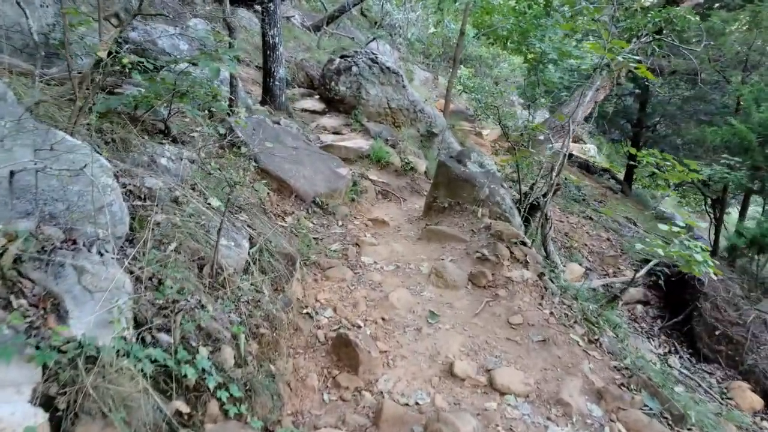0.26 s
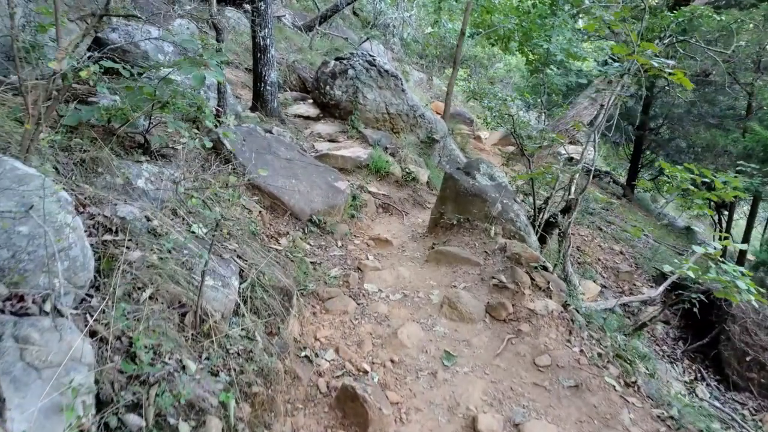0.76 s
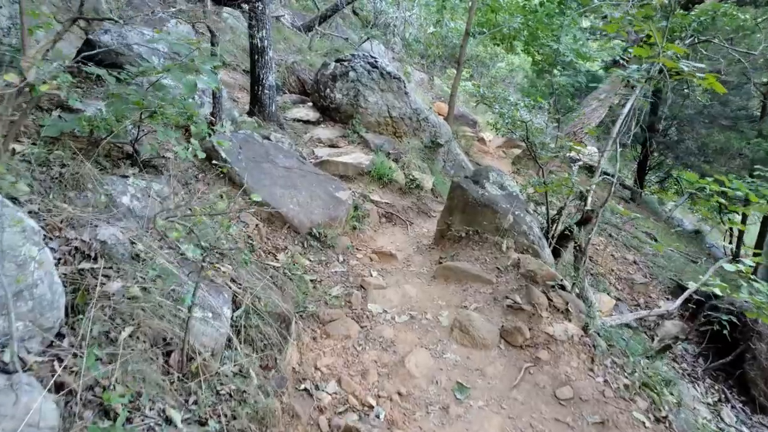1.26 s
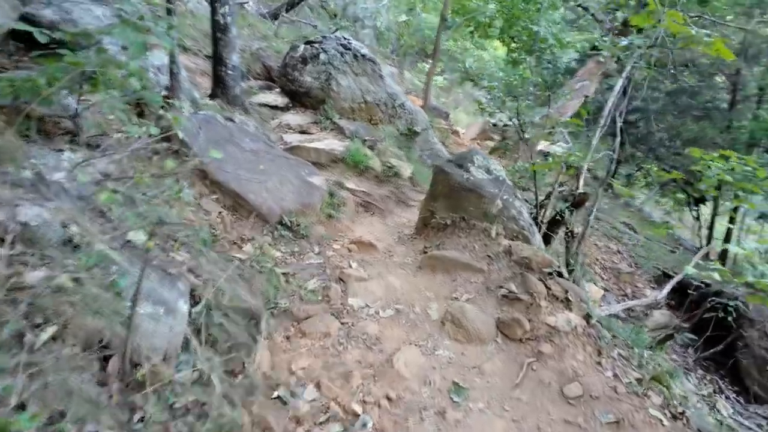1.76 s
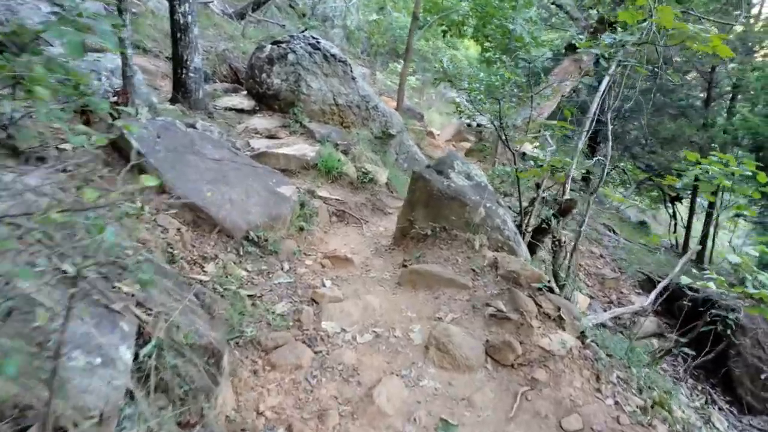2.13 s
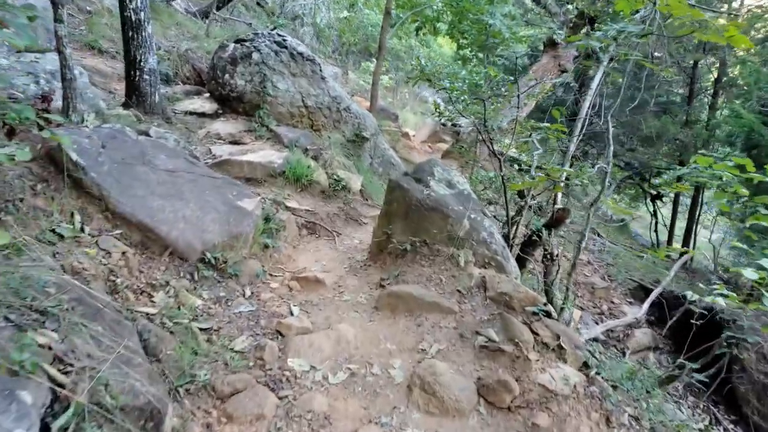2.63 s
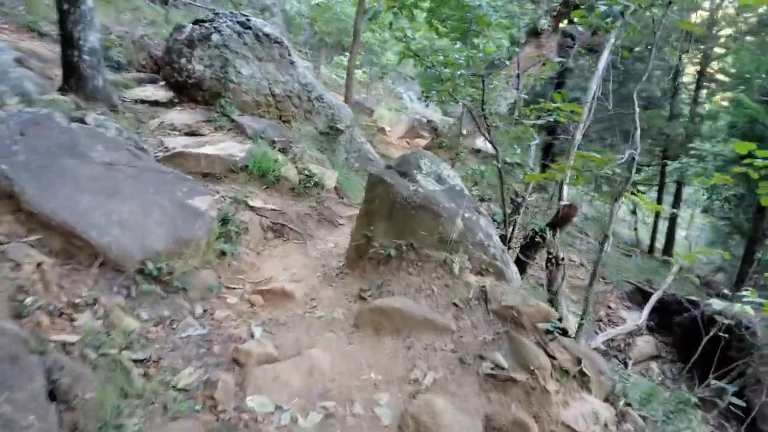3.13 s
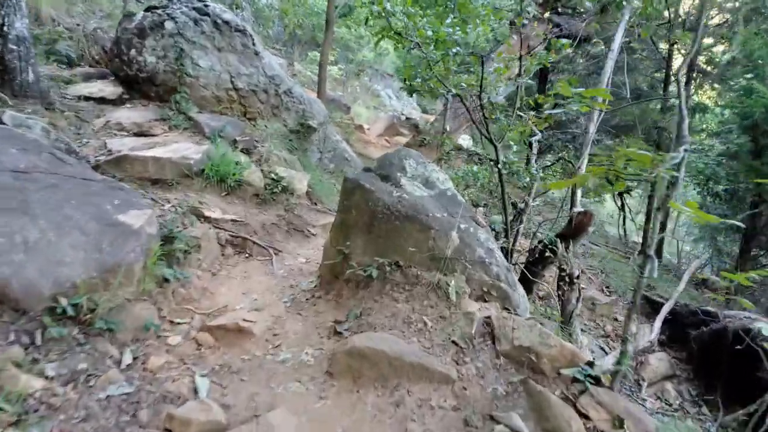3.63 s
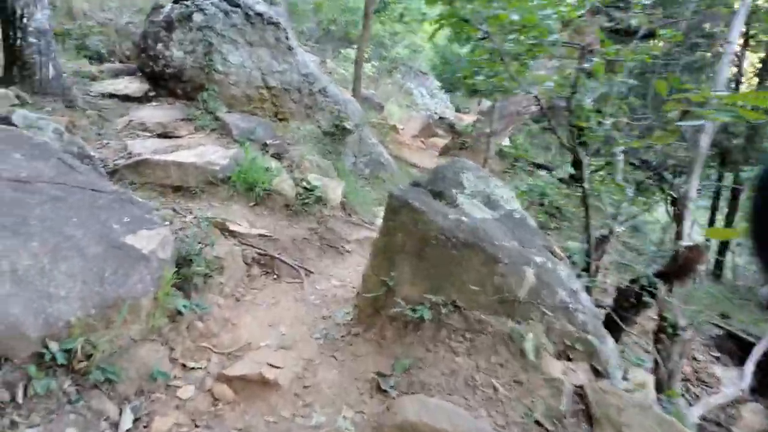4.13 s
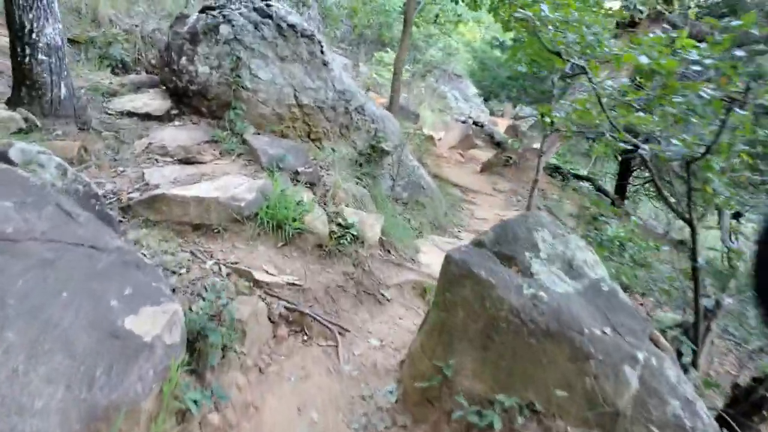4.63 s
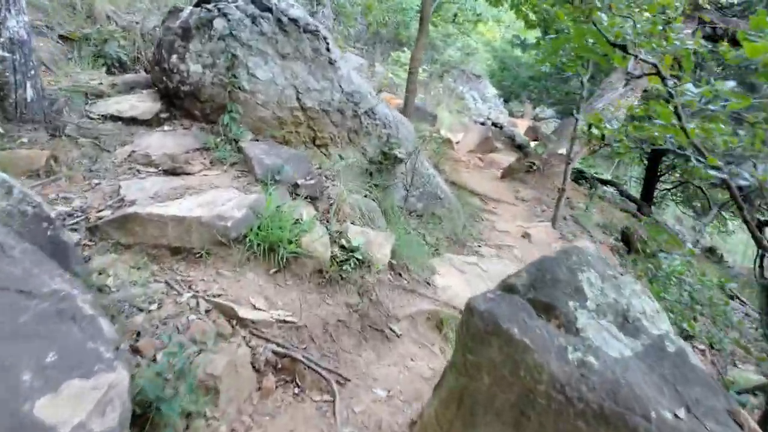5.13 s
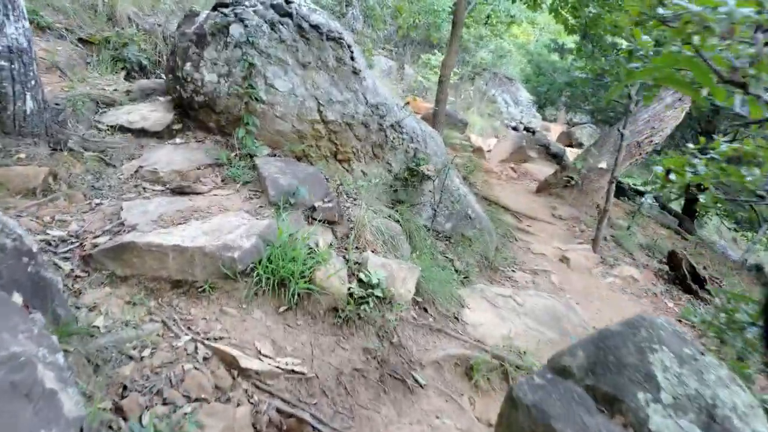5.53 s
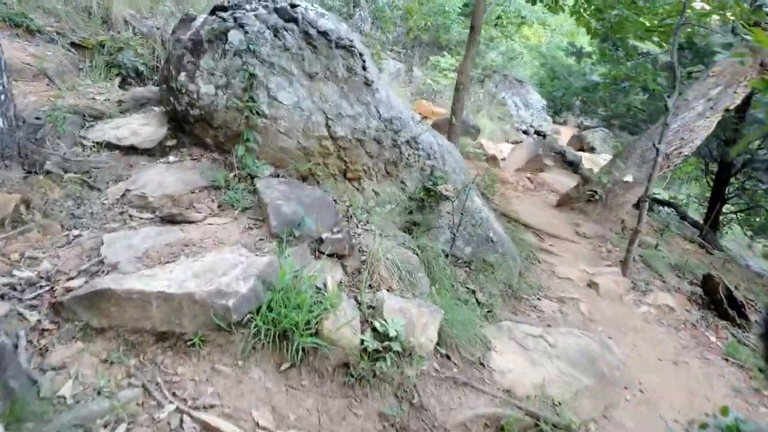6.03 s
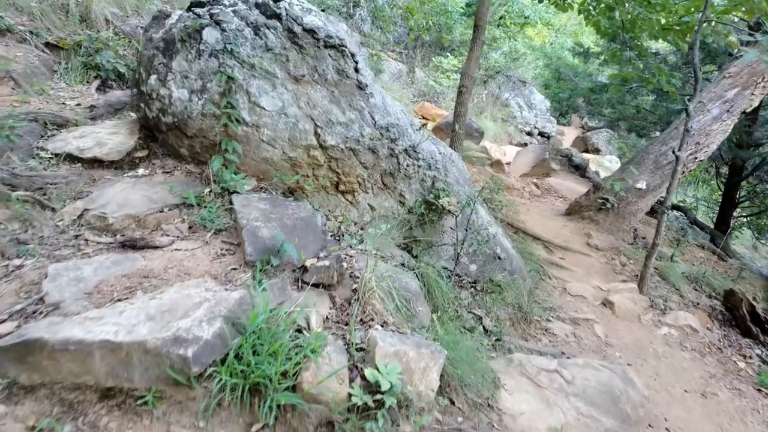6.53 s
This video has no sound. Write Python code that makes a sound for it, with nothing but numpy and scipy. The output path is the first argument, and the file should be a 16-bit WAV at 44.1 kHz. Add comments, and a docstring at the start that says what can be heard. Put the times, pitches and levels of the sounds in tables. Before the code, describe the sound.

A quiet forest heard in stereo by a microphone carried along a rocky trail. Soft scuffs of grit open the scene over a low air rumble, faint leaf hiss and a thin high insect tone. From about 0.85 s a loud bird sings short clear notes, with a long, high falling whistle at 1.0 s, then quick rising chirps until 2.1 s, echoing through the trees. A sharp twig-like snap comes near 2.15 s. Rapid down-sweeping chirps repeat from 1.9 to 3.0 s, followed by hoarse upward slurs and thin whistles. A fast warble runs from 3.7 to 4.25 s, then buzzy calls, and slower down-sweeps from 4.9 to 5.7 s. Small high whistles finish from 5.9 s. Boots crunch gravel and brush dry litter throughout, knocking stones around 1.5, 3.2 and 5.1 to 5.3 s, and again from 5.7 to 6.4 s.

```python
"""A forest with a rocky dirt trail, where songbirds whistle, trill and buzz while a hiker walks.
Each bird note is a gliding tone, and the trunks scatter it into a long tail of random echoes.
Boots knock on stones as short dying rings, and shaped noise makes the grinding grit and dull treads.
Behind them are a low rumble, a soft hiss of leaves and a thin insect tone, all filtered noise."""
import sys
import numpy as np
from scipy import signal
from scipy.fft import rfft, irfft
from scipy.io import wavfile
from scipy.ndimage import map_coordinates

SR = 44100
rng = np.random.default_rng(int(sys.argv[2]) if len(sys.argv) > 2 else 0)


def file_out(sig):
    """Save sig as 16-bit WAV at sys.argv[1]."""
    # one column per channel
    cols = np.atleast_2d(sig).T
    # limit, then scale
    lim = np.clip(cols, -1, 1)
    pcm = np.round(lim * 32767).astype(np.int16)
    wavfile.write(sys.argv[1], SR, pcm)


N = 298746
TIME = np.arange(N) / SR


def amp(db):
    """Turns decibels into a gain."""
    return 10 ** (np.asarray(db) / 20)


def unit(x):
    """Scales a sound to an rms of 1."""
    return x / np.sqrt(np.mean(x ** 2) + 1e-20)


def read(points, hz):
    """Reads a table of values by pitch, in straight lines on a log-frequency axis."""
    f, value = np.transpose(points)
    return np.interp(np.log(hz + 1), np.log(f + 1), value)


def add(mix, s, sound):
    """Adds a sound into the mix at time s, in seconds."""
    part = mix[..., max(round(s * SR), 0):][..., :sound.shape[-1]]
    part += sound[..., :part.shape[-1]]


def drift(n, rate_hz):
    """A smooth random wander around zero, with rate_hz new random points a second."""
    knots = np.arange(n) * rate_hz / SR
    return map_coordinates(rng.standard_normal(4096), [knots], order=2, mode="wrap")


def band_pass(order, low_hz, high_hz, sound):
    """Keeps the part of a sound between two frequencies."""
    sos = signal.butter(order, [low_hz, high_hz], "band", fs=SR, output="sos")
    return signal.sosfilt(sos, sound)


def colour(pair, spectrum):
    """Gives two unrelated signals a spectrum and the partial likeness of two close microphones."""
    # how alike left and right are: pitch_hz, likeness (1 same, 0 unrelated, below 0 opposed)
    likeness = [(60, 1), (250, 0.67), (600, 0.75), (1200, 0.19), (2500, 0.11), (5000, -0.18),
                (12000, -0.067)]
    hz, (a, b) = np.fft.rfftfreq(N, 1 / SR), rfft(pair)
    same = np.clip(read(likeness, hz), -1, 1)
    mid, side = a * np.sqrt(1 + same), b * np.sqrt(1 - same)
    left_right = np.array([mid + side, mid - side])
    return unit(irfft(left_right * amp(read(spectrum, hz)), N))


def birds():
    """Several perches, each with its own mix of direct sound and scatter from the wood."""
    # All bird levels here are before the paths through the forest.
    # Single notes: start_s, length_s, level_db at the peak, first_pitch_hz, last_pitch_hz,
    # lateness of the glide (1 is even), place of the peak (0-1 of the length).
    # the loud song from up the trail, and at .992 s a high falling whistle, likely another bird nearby
    loud_notes = [(.755, 0.048, -40, 4815, 4706, 0.52, 0.6), (.854, 0.037, -24, 4620, 4680, 0.37, 0.76),
                  (.992, 0.26, -28.5, 8540, 7565, 1.04, 0.54), (1.273, 0.07, -25, 4760, 4544, .4, 0.51),
                  (1.39, 0.0517, -20.5, 4630, 4540, 0.39, 0.83),
                  (1.488, 0.053, -22.5, 4614, 5000, 1.98, 0.46),
                  (1.592, 0.043, -21.5, 4493, 5555, 2.1, 0.55),
                  (1.692, 0.047, -22.5, 4467, 5440, 1.45, 0.38),
                  (1.78, 0.056, -28.5, 5150, 6204, 0.55, 0.76), (1.838, 0.0624, -36, 6180, 5870, .8, 0.6),
                  (1.933, 0.028, -20, 4354, 4325, 0.87, 0.48), (1.973, 0.039, -24, 4237, 3463, 1.1, 0.43),
                  (2.06, 0.047, -27.5, 4354, 5760, 1, 0.37), (2.115, 0.056, -35, 5240, 3645, 0.94, 0.52)]
    whistle_notes = [(.45, 0.14, -64, 8560, 8600, 2.6, .6), (.71, 0.086, -50.5, 6650, 6470, 0.47, 0.41),
                     (1.61, 0.1, -43.5, 7400, 7080, 0.3, 0.99),
                     (3.198, 0.033, -29.5, 7300, 6980, 0.32, 0.89),
                     (3.23, .116, -32, 7053, 5920, 2.55, 0.34), (3.4, 0.13, -35, 7250, 6050, 2.9, 0.79),
                     (3.585, 0.089, -39, 4840, 4520, 0.377, 0.47),
                     (4.258, 0.048, -27, 5900, 6990, 0.42, 0.75),
                     (4.302, 0.1, -34.5, 7020, 7500, 0.99, .05), (4.448, 0.031, -37, 5330, 3550, 1.07, .6),
                     (4.603, 0.083, -32.5, 6070, 6275, 0.57, 0.62),
                     (4.825, 0.029, -43, 8400, 7000, 1, 0.67), (5.925, 0.087, -36.5, 7670, 7300, 4.5, 0.52),
                     (5.972, 0.029, -46.5, 5700, 5570, 0.57, 0.43), (6.073, .066, -42, 4420, 3845, .6, .42),
                     (6.162, .027, -43, 4810, 3660, 0.67, 0.55),
                     (6.236, 0.039, -32.5, 6720, 5470, 0.89, 0.68),
                     (6.283, 0.053, -38, 5500, 5990, 0.4, 0.24),
                     (6.393, 0.053, -43.5, 7850, 7540, 0.33, .08),
                     (6.455, 0.045, -44, 7600, 6920, 0.6, 0.54), (6.615, 0.099, -40, 7640, 6760, 1.9, 1),
                     (6.655, 0.062, -55, 5450, 5000, 0.75, .35)]  # thin high whistles from closer by
    far_notes = [(.57, 0.15, -56, 2142, 2224, 0.52, 0.73), (.88, 0.083, -56.5, 2727, 2663, 1.03, 0.48),
                 (1.07, 0.21, -59.5, 2650, 2557, 1.77, .6), (3.08, 0.062, -57, 2710, 2610, .6, 0.22),
                 (4.5, 0.069, -49.5, 3017, 3130, 1.34, 0.088)]  # birds deep in the wood
    # One syllable of each trill: length_s, first_pitch_hz, last_pitch_hz, lateness, place of the peak.
    quick_sweep, slow_sweep = (.084, 7920, 3640, 1.05, 0.57), (.087, 8230, 4230, 1.15, 0.62)
    upslur = (0.067, 3100, 4700, 1.7, 0.61)
    warble_low, warble_high = (0.0757, 2970, 2690, .35, 0.14), (0.0422, 3660, 4130, 1.41, 0.58)
    # Repeats of those syllables: start_s, level_db at the peak.
    quick_repeats, slow_repeats = [(1.91, -44), (2.257, -47.5), (2.397, -43), (2.53, -44), (2.661, -42.5),
                                   (2.796, -41.5), (2.929, -42)], [(4.907, -41.5), (5.082, -41.5), (5.26, -41),
                                                        (5.434, -39.5), (5.609, -41.5)]
    upslur_repeats = [(3.078, -51.5), (3.277, -46.5), (3.473, -44), (3.672, -46.5)]
    warble_repeats = [(3.723, -36), (3.813, -37.5), (3.913, -37), (4.001, -36), (4.091, -36),
                      (4.179, -37.5)]

    loud = sing(loud_notes, waver=0.0041, edge_s=0.0064, droop_db=17.5, stumble_s=0.0039)
    whistles = sing(whistle_notes, waver=0.0044, edge_s=0.006, droop_db=9.5)

    sweep_notes = trill(quick_sweep, quick_repeats) + trill(slow_sweep, slow_repeats)
    sweeps = sing(sweep_notes, waver=0.0044, edge_s=0.00075, droop_db=21.5)
    # a fast sweep flickers as it crosses the peaks and dips of the path
    sweeps = sweeps * amp(5.0 * np.tanh(drift(N, 160)))

    upper = sing(trill(warble_high, warble_repeats), waver=0.0098, edge_s=0.0039, droop_db=23.5)
    # the lower voice starts earlier and skips the first repeat
    lower_notes = trill(warble_low, warble_repeats[1:], lead_s=.021)
    lower = sing(lower_notes, waver=0.0345, edge_s=0.003, droop_db=4)
    warble = upper + amp(-15.0) * lower  # the two sides of the syrinx sound together

    far = sing(far_notes, waver=0.016, edge_s=0.0023, droop_db=14.5)
    hoarse_notes = trill(upslur, upslur_repeats)
    hoarse = sing(hoarse_notes, waver=0.019, edge_s=0.0019, droop_db=17.5, stumble_s=0.0071)

    return (forest(loud, direct_db=0.5, near_db=-3, near_t60=0.43,
                   deep_db=-10.5, deep_t60=2.85, right_db=1.0, port_angle=2.23)
            + forest(whistles, direct_db=-0.5, near_db=-6.0, near_t60=0.19,
                     deep_db=-11, deep_t60=2.8, right_db=4, port_angle=1.94)
            + forest(sweeps, direct_db=1.0, near_db=-3, near_t60=0.092,
                     deep_db=-4.0, deep_t60=0.95, right_db=4.0, port_angle=1.82)
            + forest(warble, direct_db=1.5, near_db=-4, near_t60=0.27,
                     deep_db=-5, deep_t60=2.4, right_db=3, port_angle=1.84)
            + forest(far, direct_db=2.5, near_db=-9.5, near_t60=0.2,
                     deep_db=4.0, deep_t60=0.61, right_db=0.5, port_angle=1.66)
            + forest(hoarse, direct_db=5.5, near_db=2, near_t60=0.089,
                     deep_db=6, deep_t60=1.8, right_db=2, port_angle=2.52)
            + forest(buzzes(), direct_db=0, near_db=2.5, near_t60=0.046,
                     deep_db=3.5, deep_t60=1.0, right_db=0.5, port_angle=2.78))


def sing(notes, waver, edge_s, droop_db, stumble_s=0):
    """The syrinx (the bird's voice organ) gives one pure, gliding tone a note, as a rotating phasor."""
    voice = np.zeros(N, complex)
    for start, length, db, first_hz, last_hz, lateness, peak in notes:
        t = np.arange(0, length, 1 / SR)
        # a stumbling glide runs a little ahead and behind, so the fastest flicks are the roughest
        progress = np.clip((t + stumble_s * drift(len(t), 419.3)) / length, 0, 1)
        # the pitch eases along an S, early if lateness is under 1 and late if over
        glide = np.sin(np.pi / 2 * progress ** lateness) ** 2
        quiver = 1 + waver * drift(len(t), 351.0)
        pitch = (first_hz + (last_hz - first_hz) * glide) * quiver
        fade = np.sin(np.pi / 2 * np.clip(np.minimum(t, length - t) / edge_s, 0, 1))
        # the level droops on both sides of the peak
        level = amp(db - droop_db * abs(t / length - peak)) * fade
        phase = 2 * np.pi * np.cumsum(pitch) / SR
        add(voice, start, np.sqrt(2) * level * np.exp(1j * phase))
    return voice


def trill(syllable, repeats, lead_s=0):
    """Lists the same syllable sung again and again, each lead_s seconds early."""
    length, *shape = syllable
    return [(s - lead_s, length, db, *shape) for s, db in repeats]


def buzzes(flutter_hz=130, uneven=0.37, swing_spread=0.264):
    """A fast, uneven flutter of the syrinx swings the pitch so that it smears into a soft-edged band."""
    # buzzy calls deep in the wood: start_s, end_s, level_db, first_pitch_hz, last_pitch_hz,
    # swing_hz (typical reach to each side)
    calls = [(1.656, 1.708, -50, 3380, 3700, 220), (1.796, 1.875, -48, 3730, 3415, 240),
             (2.384, 2.807, -57.5, 7280, 7100, 1620), (3.643, 4.147, -54, 6750, 6610, 2085),
             (4.203, 4.299, -45.5, 2850, 3167, 300), (4.343, 4.403, -47.5, 5000, 4860, 620),
             (4.4, 4.446, -42, 4630, 2967, 400), (4.68, 4.834, -49.5, 3050, 4156, 524),
             (4.799, 4.973, -52, 3715, 4630, 606)]
    voice = np.zeros(N, complex)
    for start, end, db, first_hz, last_hz, swing_hz in calls:
        n = int((end - start) * SR)
        rate = flutter_hz * (1 + uneven * drift(n, 200))
        flutter = signal.sawtooth(2 * np.pi * np.cumsum(rate) / SR, .5)  # a triangle wave
        swing = swing_hz * flutter * (1 + swing_spread * drift(n, 250))
        pitch = np.linspace(first_hz, last_hz, n) + swing
        level = amp(db) * signal.windows.tukey(n, .6)
        phase = 2 * np.pi * np.cumsum(pitch) / SR
        add(voice, start, np.sqrt(2) * level * np.exp(1j * phase))
    return voice


def forest(voice, direct_db, near_db, near_t60, deep_db, deep_t60, right_db, port_angle):
    """Direct sound, quick scatter from nearby trunks and ground, and a long tail from the deep wood."""
    # each t60 is the time in seconds to die by 60 dB; right_db is how much louder the right side is
    t = np.arange(int(1.5 * SR)) / SR
    echoes = rng.standard_normal((2, 2, len(t))) * (rng.random((2, 2, len(t))) < .06)
    near, deep = echoes
    # the nearest trunks answer a little later
    near = near * amp(-60 * t / near_t60) * np.clip((t - .006) / 0.0027, 0, 1)
    deep = deep * amp(-60 * t / deep_t60) * (1 - np.exp(-t / 0.017))
    # sound from one side meets the two microphones out of step, by port_angle radians
    ports = np.exp(-1j * port_angle * np.arange(2))[:, None]
    near_paths = amp(near_db) * unit(near + 0.12 * ports * near[0])
    deep_paths = amp(deep_db) * unit(deep + 0.27 * ports * deep[0])
    paths = (near_paths + deep_paths) / np.sqrt(len(t))
    # both sides get the same total scatter
    total = np.hypot(amp(near_db), amp(deep_db))
    paths = paths / np.linalg.norm(paths, axis=1, keepdims=True) * total
    paths[:, :1] += amp(direct_db) * ports
    heard = signal.fftconvolve(voice[None], paths, axes=1)[:, :N].real
    return heard * amp([[-right_db / 2], [right_db / 2]])


def knocks(thud_db=-8, crush_db=-13, settle_db=-27, level_db=2):
    """A boot lands: a stone rings for a few cycles, the earth thuds, and grit is crushed and settles."""
    # boots on stone and packed earth: start_s, level_db (before level_db above), pitch_hz,
    # ring_s (time for the ring to die by 60 dB)
    landings = [(.294, -53, 766, 0.03), (.946, -45, 950, 0.033), (1.47, -36.5, 650, 0.012),
                (1.513, -32.5, 1200, 0.0064), (1.579, -42, 1580, 0.02), (1.597, -44, 1170, .015),
                (1.725, -37.5, 353, 0.041), (1.978, -45.5, 410, 0.042), (2.112, -42.5, 640, 0.028),
                (2.156, -40.5, 726, 0.021), (2.663, -42, 298, 0.053), (2.712, -36, 235, 0.024),
                (2.818, -37, 910, 0.0063), (2.972, -48.5, 910, 0.026), (3.02, -36.5, 1140, .007),
                (3.169, -35, 455, 0.029), (3.172, -33.5, 1510, 0.016), (3.19, -42, 740, .066),
                (3.284, -45.5, 1140, 0.031), (3.346, -46, 1100, 0.036), (3.498, -43, 1050, 0.016),
                (3.767, -44, 476, 0.018), (4.447, -48, 498, .038), (4.653, -45.5, 492, 0.054),
                (4.962, -43, 620, .038), (5.024, -39.5, 837, 0.027), (5.113, -30, 537, 0.031),
                (5.119, -33.5, 210, .027), (5.21, -37, 634, 0.055), (5.274, -26.5, 970, 0.012),
                (5.68, -31.5, 810, 0.01), (5.711, -36.5, 755, .015), (5.84, -34, 850, .007),
                (5.905, -41, 1410, 0.0064), (6.09, -27.5, 1150, 0.0059), (6.259, -28.5, 1070, 0.0092),
                (6.296, -35, 800, 0.0086), (6.426, -36, 510, 0.014)]
    out, t = np.zeros((2, N)), np.arange(5000) / SR
    for s, db, hz, t60 in landings:
        ring = np.sin(2 * np.pi * hz * t) * amp(-60 * t / t60)
        thud = np.sin(2 * np.pi * hz * 0.45 * t) * amp(-90 * t / t60)
        grit = band_pass(2, hz * .5, min(hz * 1.52, SR / 3), rng.standard_normal((3, len(t))))
        grit = unit(grit[:2] + grit[2])  # the third noise is common to both sides
        crush = grit * (amp(crush_db - 60 * t / t60) + amp(settle_db - 60 * t / 0.23))
        onset = 1 - np.exp(-t / 0.00019)
        add(out, s, amp(db + level_db) * (ring + amp(thud_db) * thud + crush) * onset)
    return out


def treads(low_hz=140, high_hz=400):
    """Earth gives under the sole with a dull murmur of low noise."""
    # the weight settling on packed earth: start_s, level_db, length_s
    steps = [(1.704, -56, 0.11), (1.957, -64.5, 0.3), (2.628, -57, 0.32), (3.685, -62, 0.17),
             (4.603, -74, .12), (4.952, -73, 0.32), (6.2, -84, 0.33)]
    weight = np.zeros(N)
    for s, db, length in steps:
        add(weight, s, amp(db) * signal.windows.tukey(int(length * SR), .4))
    shared, left, right = rng.standard_normal((3, N))
    earth = band_pass(2, low_hz, high_hz, shared + 0.55 * np.array([left, right]))
    return weight * unit(earth)


def snaps(ring_s=0.00083, tail_db=-28, level_db=-1):
    """Grit and twigs crack with a bright tick of noise and a short scatter."""
    # snaps of grit and twigs: start_s, level_db (before level_db above and the dying away)
    cracks = [(0.293, -43), (0.886, -45), (.948, -38), (1.004, -38), (2.063, -38), (2.075, -34),
              (2.145, -22), (3.023, -42), (3.289, -48), (3.811, -41), (4.643, -33), (4.967, -43),
              (5.815, -35), (5.906, -34.5), (5.928, -29), (6.091, -35), (6.398, -40), (6.669, -41)]
    out, t = np.zeros((2, N)), np.arange(2000) / SR
    for s, db in cracks:
        tick = unit(band_pass(1, 2500, 13000, rng.standard_normal((2, len(t)))))
        decay = np.exp(-t / ring_s) + amp(tail_db) * np.exp(-t / 0.015)
        add(out, s, amp(db + level_db) * tick * decay)
    return out


def grains(per_s, spread_db, bed):
    """Countless tiny contacts of uneven size over a smooth bed of rubbing."""
    size = amp(spread_db * np.minimum(rng.exponential(1, (2, N)), 3.5))
    clicks = size * rng.choice([-1, 1], (2, N)) * (rng.random((2, N)) < per_s / SR)
    return unit(clicks) + bed * rng.standard_normal((2, N))


def scuffs(gravel_db=3.5, rustle_db=3, sand_db=-3):
    """Soles grind gravel, brush dry litter and crack single grains of sand as the weight rolls over."""
    # a sole slides or rolls on the trail: start_s, rise_s, length_s, grind_db, brush_db
    # (levels before the three settings above)
    slides = [(0, 0.011, 0.24, -62, -74), (0.283, 0.0072, .13, -54, -73), (0.772, .02, 0.22, -57, -72),
              (0.861, 0.072, 0.15, -52, -55), (1.053, 0.15, 0.17, -60.5, -47.5),
              (1.28, 0.15, 0.25, -55.5, -54), (1.552, 0.021, 0.031, -46, -58),
              (1.657, 0.039, .14, -71, -57), (1.88, 0.13, 0.27, -57, -55.5),
              (2.128, .01, 0.079, -55, -55.5), (2.2, .02, 0.13, -58.5, -65), (2.657, 0.021, 0.2, -54, -65),
              (2.945, 0.022, 0.056, -56.5, -60), (3.163, .005, 0.037, -49, -55),
              (3.24, 0.043, 0.3, -60.5, -62), (3.72, .03, 0.19, -57.5, -62),
              (3.852, 0.033, 0.026, -49, -49.5), (4.122, 0.012, 0.082, -57, -56),
              (4.435, 0.013, 0.23, -55, -61), (4.59, 0.053, 0.097, -51, -49),
              (4.941, 0.038, 0.11, -46.5, -49), (5.071, 0.014, 0.21, -57, -52),
              (5.584, 0.069, .12, -51.5, -61), (5.812, 0.023, 0.17, -57.5, -56),
              (6.068, .04, 0.28, -57, -62), (6.177, 0.035, .13, -51, -53.5),
              (6.363, 0.033, 0.11, -61, -50.5), (6.485, .03, 0.24, -66, -61)]
    # tone of the gravel, and of the dry litter and sand: pitch_hz, level_db per Hz (relative)
    gravel_tone, rustle_tone = [(100, -7), (250, -3), (550, 0), (1100, -1.5), (1600, -1), (2200, -4.5),
                                (4000, -1.5), (9000, -26)], [(800, -2), (2500, -14.5), (5000, 2), (8000, 1.5),
                                                (10000, -7), (12200, -0.5), (13800, -4), (16000, -13)]
    sag_db = 3.5  # after its bite the sole eases off
    release_s = 0.032  # and the grit comes to rest
    # loose ground keeps shifting between the steps
    grind, brush = np.full(N, amp(-69.5)), np.full(N, amp(-70.5))
    for start, rise, length, grind_db, brush_db in slides:
        t = np.maximum(TIME - start, 0)
        press = np.minimum(t / rise, 1) * amp(-sag_db * np.minimum(t / length, 1))
        press = press * np.exp(-np.maximum(t - length, 0) / release_s)
        grind = np.maximum(grind, amp(grind_db) * press)
        brush = np.maximum(brush, amp(brush_db) * press)
    gravel = colour(grains(per_s=300, spread_db=5.0, bed=0.89), gravel_tone) * grind
    rustle = colour(grains(per_s=2200, spread_db=3.5, bed=0.8), rustle_tone) * brush
    sand = colour(grains(per_s=50, spread_db=1.5, bed=0), rustle_tone) * brush
    return amp(gravel_db) * gravel + amp(rustle_db) * rustle + amp(sand_db) * sand


def air(level_db=-54, rumble_hz=180):
    """Shaped noise gives a low rumble that swells and sinks, and the faint hiss of leaves."""
    # tone of still air in the wood: pitch_hz, level_db per Hz (relative)
    air_tone = [(20, -42), (35, -12), (55, 0), (92, 2.5), (135, -5.5), (220, -12.5), (500, -18.5),
                (1000, -27), (1800, -22), (2400, -22), (4500, -22), (8000, -24.5), (10000, -27.5),
                (12300, -29), (16000, -33.5)]
    # rise and fall of the rumble: time_s, change_db
    rumble_swell = [(0, 0.5), (1.7, 1.5), (3.0, -0.5), (3.85, 3), (4.2, -3.5), (4.8, -1), (5.7, .5),
                    (6.2, -2.5), (6.77, -3.5)]
    sound = amp(level_db) * colour(rng.standard_normal((2, N)), air_tone)
    low = signal.sosfiltfilt(signal.butter(2, rumble_hz, fs=SR, output="sos"), sound)
    hiss = sound - low
    return hiss + low * amp(np.interp(TIME, *np.transpose(rumble_swell)))


def insects(pitch_hz=6980, width_hz=110, level_db=-66, swell_db=2):
    """Distant insects merge into one thin fuzzy tone: a narrow band of noise whose level wanders."""
    hz = np.fft.rfftfreq(N, 1 / SR)
    band = np.exp(-.5 * ((hz - pitch_hz) / width_hz) ** 2)
    tone = unit(irfft(rfft(rng.standard_normal((2, N))) * band, N))
    return amp(level_db + swell_db * drift(N, 6.65)) * tone


def scene():
    """Birds, boots on the trail, and the quiet air and insects behind them."""
    return birds() + knocks() + treads() + snaps() + scuffs() + air() + insects()


def record(dry, edge_hz=15900):
    """Takes away the treble above edge_hz with a steep low-pass filter."""
    low_pass = signal.firwin(511, edge_hz, window=("kaiser", 9), fs=SR)
    return signal.oaconvolve(dry, low_pass[None], "same")


dry = scene()
out = record(dry)
file_out(out)
```